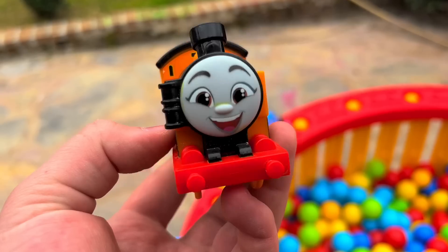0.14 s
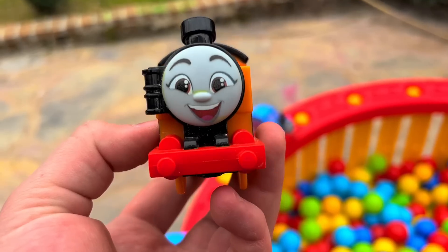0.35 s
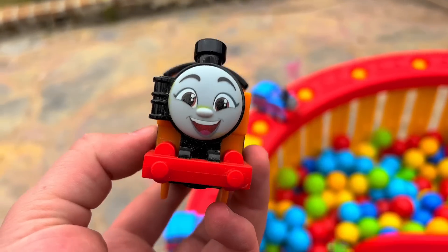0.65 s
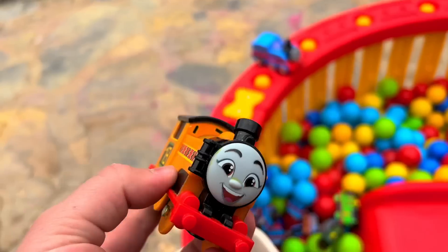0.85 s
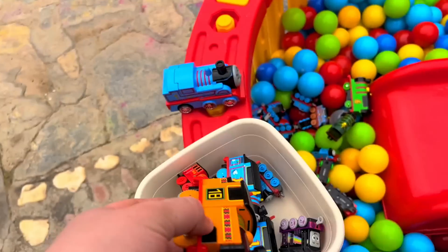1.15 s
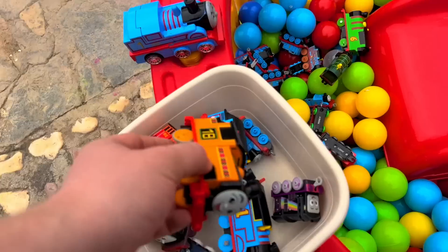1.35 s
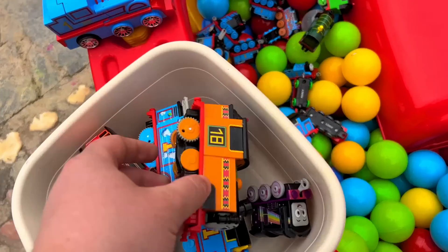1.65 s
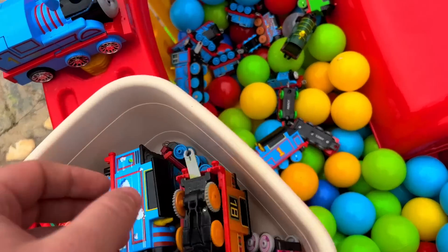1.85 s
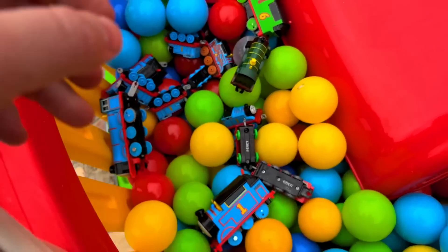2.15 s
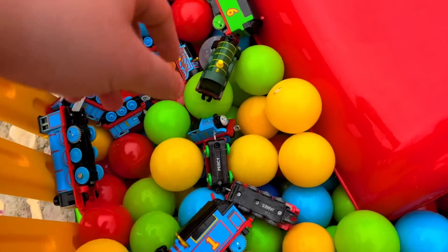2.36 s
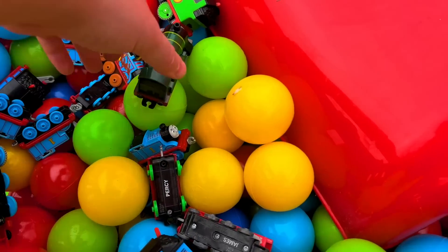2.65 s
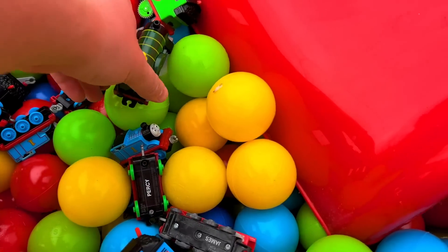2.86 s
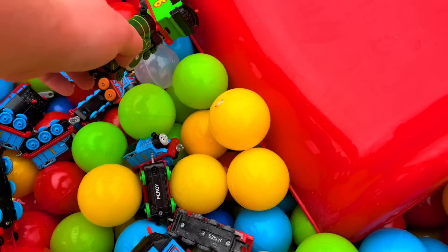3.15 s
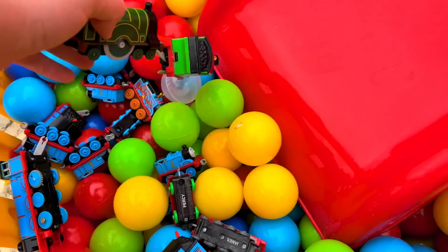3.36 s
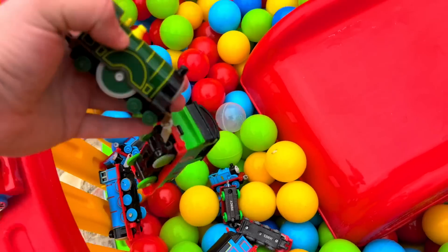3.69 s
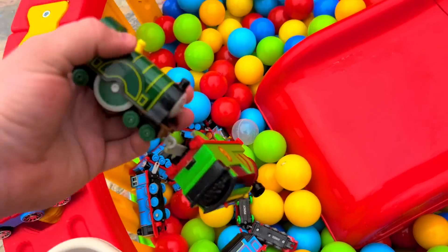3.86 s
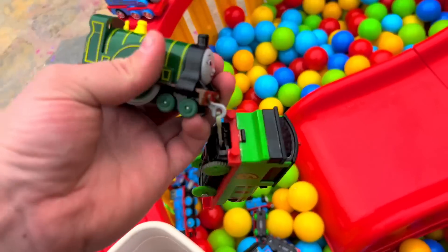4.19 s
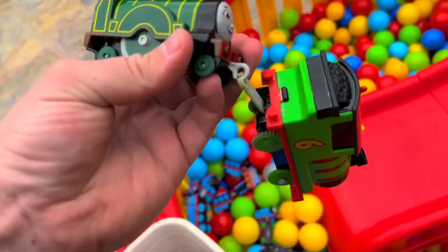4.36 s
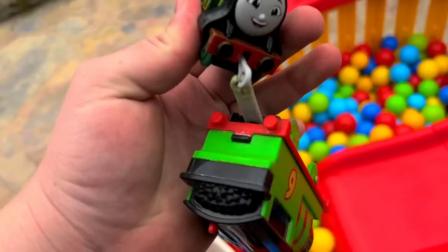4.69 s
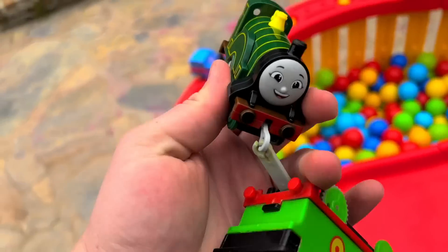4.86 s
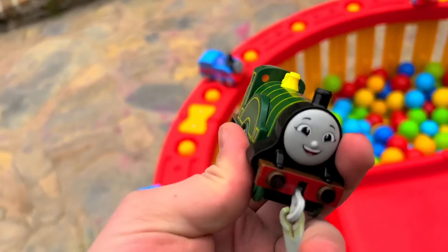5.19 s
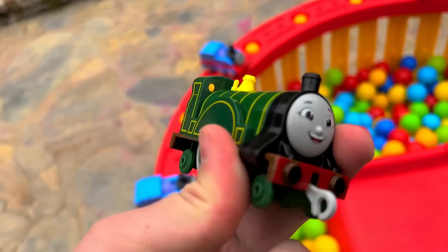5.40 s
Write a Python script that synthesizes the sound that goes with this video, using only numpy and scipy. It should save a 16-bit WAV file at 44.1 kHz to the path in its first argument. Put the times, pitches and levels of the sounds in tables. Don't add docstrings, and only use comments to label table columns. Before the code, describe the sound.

Quiet outdoor yard, then a hollow plastic toy clatters into a tub, soft digging among light balls, small clicks and two sharp snaps in gusty wind.

```python
import sys
import numpy as np
from scipy import signal
from scipy.fft import rfft, irfft, next_fast_len
from scipy.io import wavfile
from scipy.ndimage import uniform_filter1d

SR = 44100
rng = np.random.default_rng(int(sys.argv[2]) if len(sys.argv) > 2 else 0)


def volts(x):
    e = np.asarray(x, float) / 20
    return 10 ** e


def digitize_waveform(pressure):
    field = np.atleast_2d(pressure).T
    bounded = np.clip(field, -1, 1)
    quanta = np.round(bounded * 32767).astype(np.int16)
    wavfile.write(sys.argv[1], SR, quanta)


N = 243917
T = np.arange(N) / SR
M = next_fast_len(N)
F = np.fft.rfftfreq(M, 1 / SR)
EVENT_N = 3072
EVENT_T = np.arange(EVENT_N) / SR

# [pitch_hz, level_db, t60_s]
TOY_MODES = [(1366, -10, 0.11), (1480, -7, 0.033), (2490, -23, 0.04), (3030, -21.5, 0.027)]
# [frequency_hz, left_minus_right_db]
PORT_DB = [(60, 0), (130, -3), (200, -10), (340, -11), (700, -2), (1150, 7), (1700, 3), (3400, 2),
           (5200, 0)]


def unit(x):
    return x / np.sqrt(np.mean(x ** 2))


def peak_one(x):
    return x / np.abs(x).max()


def over_time(table, **ends):
    return np.interp(T, *np.transpose(table), **ends)


def on_log(table):
    hz, value = np.transpose(table)
    return np.interp(np.log(F + 1), np.log(hz + 1), value)


def band(x, lo_hz, hi_hz):
    return signal.sosfilt(signal.butter(2, [lo_hz, min(hi_hz, .45 * SR)], "bandpass", fs=SR, output="sos"), x)


def ring(x, modes):
    out = 0
    for hz, db, t60 in modes:
        pole = np.exp(2j * np.pi * hz / SR - np.log(1000) / (t60 * SR))
        out = out + volts(db) * signal.lfilter([1], [1, -pole], x).imag
    return out


def walk(rate):
    k = int(SR / rate)
    steps = np.repeat(rng.standard_normal(N // k + 1), k)
    return unit(uniform_filter1d(uniform_filter1d(steps, k), k)[:N])


def add_at(out, start_s, sound):
    i = int(start_s * SR)
    out[i:i + EVENT_N] += sound


def gripped_body(push, grip_s):
    return ring(push, TOY_MODES) * (1 - np.exp(-EVENT_T / 0.0024)) * np.exp(-(EVENT_T / grip_s) ** 2)


def wall_thud(push, knock_db, spread):
    soft_blow_hz, db_per_octave, lag_s = 240, 55, 0.00511
    wall_hz = soft_blow_hz * 2 ** ((knock_db + 38.0) / db_per_octave)
    walls = [(wall_hz * 1.28 ** spread[0], 0, .018), (470, -1, .018)]
    walls += [(wall_hz * 1.725 ** u, -5, .022) for u in spread[3:]]
    return np.roll(band(ring(push, walls), 170, 1600), int(lag_s * SR))


def contacts(rows, rise_s, chatter_s, crack_t60_s, trim_db, grit_db, grip_s=None):
    out = np.zeros(N + EVENT_N)
    onset = 1 - np.exp(-EVENT_T / rise_s)
    chatter = onset * np.exp(-EVENT_T / chatter_s)
    noises = rng.standard_normal((len(rows), 3, EVENT_N))
    cracks = band(band(noises[:, 2] * onset * volts(-60 * EVENT_T / crack_t60_s), 5100, 16000), 4500, 21000)
    cracks = cracks + volts(-1.5) * band(cracks, 3300, 7300)
    for (s, db, hz, crack_db, *body_db), noise, crack in zip(rows, noises, cracks):
        spread = noise[2, -6:].clip(-2, 2)
        shell = [(hz, 0, .012)] + [(hz * 1.375 ** u, -6, .011) for u in spread[:3]]
        grit = band(noise[1] * chatter ** .5, 0.26 * hz, 3.48 * hz)
        knock = peak_one(ring(chatter * noise[0], shell)) + volts(grit_db) * peak_one(grit)
        if grip_s:
            body = gripped_body(chatter * noise[1], grip_s)
        else:
            body = wall_thud(noise[0] * chatter ** 0.357, db, spread)
        under_db = body_db[0] if body_db else -16
        sound = peak_one(band(knock, 0.62 * hz, 7040))
        sound = sound + volts(crack_db) * peak_one(crack) + volts(under_db) * peak_one(body)
        add_at(out, s - rise_s, volts(db + trim_db) * sound)
    return out[:N]


def tub_and_pit_contacts():
    # [start_s, knock_peak_db, shell_hz, crack_over_knock_db, thud_over_knock_db]
    tub_hits = [(1.54, -9, 860, -9.5, -18.5), (1.558, -26.5, 730, -17, -6), (1.6, -33.5, 910, -7, 2),
                (1.628, -32.5, 990, -9, -5), (1.683, -21, 900, -3, -6), (1.698, -18.5, 1990, -15, -14),
                (1.71, -15, 1670, -19, -8), (1.721, -16.5, 666, -42, -9.5), (1.735, -27.5, 759, -3, -0.5),
                (1.762, -17, 1960, -9.5, -32), (1.767, -9, 920, 0.5, -17), (1.78, -8, 1010, -19, -15.5),
                (1.788, -6.5, 1480, -40, -21), (1.795, -12, 704, -9.5, -31.5),
                (1.806, -10.5, 1050, -9.5, -17.5), (1.819, -19, 1970, -3, -27.5),
                (1.833, -12, 1550, -10.5, -5), (1.837, -12, 850, -17.5, -10.5),
                (1.871, -24.5, 1510, -5, -1), (1.89, -30, 2890, -3.5, -9.5), (1.903, -42.5, 717, 2, -11),
                (1.914, -51.5, 780, -19, 9.5), (1.97, -28, 2320, -28, -5), (1.995, -42, 2030, -0.5, -11.5)]
    pit_hits = [(2.863, -49.5, 2410, -2.5, 1), (2.912, -44.5, 3750, 9, 4), (2.916, -41.5, 1640, -16, 3.5),
                (2.932, -50.5, 1030, -7, 14.5), (2.982, -45.5, 1080, 11, 0), (3.012, -36.5, 2930, 3, 3),
                (3.036, -24, 1350, -7.5, 4), (3.068, -60.5, 1620, 15, 18), (3.154, -27, 1060, -19, -5.5),
                (3.203, -32.5, 1610, -5, -2), (3.216, -27, 3250, 3, -10.5), (3.233, -30, 2580, -4, -29),
                (3.242, -26.5, 3150, -9, -19), (3.258, -22.5, 3110, 2.5, -9.5),
                (3.282, -36.5, 1410, 9.5, -23), (3.299, -37, 1380, 5, -0.5), (3.313, -46.5, 2630, 16, 10),
                (3.349, -27, 1046, -17, -9.5), (3.369, -50, 900, 9, 7.5)]
    tub = contacts(tub_hits, 0.00055, 0.0035, 0.037, -2.3, -1.3)
    return tub + contacts(pit_hits, 0.00078, 0.0037, 0.033, -2.25, -6.0)


def hand_contacts():
    # [start_s, knock_peak_db, shell_hz, crack_over_knock_db]
    lowered = [
        (0.9784, -40, 4700, -7),
        (0.9877, -36, 2620, 3),
        (1.0054, -38.5, 4670, 0),
        (1.0228, -42, 4600, -22),
        (1.034, -44, 4620, -20),
        (1.0595, -25.5, 4830, 0.5),
        (1.0786, -37, 2170, -26),
        (1.284, -49, 2330, -2),
    ]
    lifted = [(3.645, -58.5, 3980, 11), (3.675, -39, 3130, -3), (3.7395, -44, 1740, -5),
              (3.8, -34, 2900, 13.5), (3.8287, -45, 1680, -24), (3.8741, -38, 1630, -3.5),
              (3.947, -45.5, 1580, -24), (3.9875, -36.5, 2020, -26), (3.9934, -38.5, 2080, -24),
              (4.0253, -43, 1760, -32.5), (4.059, -34.5, 2630, 6.5)]
    # [start_s, knock_peak_db, shell_hz, crack_db, hollow_body_db]
    swinging = [(4.0767, -44, 1520, -34, 3), (4.1077, -29.5, 1550, 7.5, -25), (4.1112, -23, 1640, 0, -8),
                (4.121, -34, 1700, -21, -14), (4.1445, -30, 1480, -12, -6), (4.201, -41.5, 1550, -7, -19),
                (4.261, -46, 1660, 3, -16), (4.2976, -44.5, 1700, 8, -28), (4.338, -29.5, 1840, -2, -10.5),
                (4.3682, -39, 1670, -16, -14), (4.451, -31, 880, -17, -39), (4.4842, -39, 1680, -16, -20),
                (4.4909, -38, 3040, 5.5, -25.5), (4.5207, -25.5, 1980, -4, -12),
                (4.5532, -46, 1650, 11, -13), (4.5718, -53, 1370, 21, -11),
                (4.6198, -27.5, 2830, -0.5, -18), (4.6484, -53, 1390, -10, -18),
                (4.6795, -26, 1480, -3.5, -27), (4.6942, -27, 2090, -18, -32),
                (4.7046, -35.5, 1350, -17, -7), (4.7802, -34.5, 1610, -18, 1),
                (4.8078, -42, 2500, -12, -16)]
    snapping = [(4.9844, -68, 2400, 26, -6), (5.058, -12.5, 1818, 2, -0.5), (5.1264, -47, 3470, -2, -18),
                (5.1494, -41.5, 2730, 6, -8), (5.2083, -30.5, 2320, -3.5, -3.5),
                (5.2787, -28.5, 2440, -21.5, -1), (5.2877, -11, 2590, 8.5, -6), (5.299, -24.5, 2230, 9, 2),
                (5.3074, -18.5, 2200, 4.5, -10), (5.3239, -27, 2410, 11, -15),
                (5.3453, -30.5, 1790, 12, -21), (5.3707, -35.5, 2490, -13, -12),
                (5.4178, -51, 1590, 12, -14), (5.445, -37, 1900, -24.5, 0.5), (5.4617, -42, 2130, 4, -4)]
    tight_s, loose_s, snap_s = 0.018, 0.089, 0.01
    out = contacts(lowered, 0.00041, 0.0035, 0.034, -2.3, -2.5, tight_s)
    for rows, grip_s in (lifted, tight_s), (swinging, loose_s), (snapping, snap_s):
        out = out + contacts(rows, 0.0006, 0.0038, 0.012, -0.76, -8.5, grip_s)
    return out


def rattle():
    # [time_s, level_db]
    stir_tables = [
        [(1.538, -35), (1.59, -56.5), (1.66, -55), (1.706, -44.5), (1.766, -41), (1.834, -36), (1.88, -51),
         (1.96, -63.5), (2.04, -74)],
        [(2.84, -82.5), (2.924, -56), (3.0, -69), (3.1, -59), (3.17, -55), (3.215, -51), (3.26, -39),
         (3.32, -55.5), (3.42, -73)],
    ]
    # [start_s, peak_db, length_s]
    fiddling = [(1.036, -62, 0.047), (4.095, -64, 0.095), (3.66, -62, 0.01), (4.118, -54.5, 0.049),
                (4.355, -57.5, 0.033), (4.697, -55.5, 0.033), (4.505, -46, 0.017), (4.598, -59.5, 0.1),
                (4.806, -65, 0.32), (5.315, -41, 0.011), (5.36, -67, 0.011), (5.436, -51.5, 0.044)]
    # [pitch_hz, level_db, t60_s]
    wall_modes = [(82.2, -11, 0.21), (140, -17, 0.04), (188, -8.5, 0.1), (250, 6, 0.06),
                  (329.2, -2.5, 0.022), (424, -2.5, .05), (560, 6.5, 0.0097)]
    # [level_db], tub then pit
    rumble_db = [9.5, 1.5]
    swell_db_per_s, settle_db_per_s = 431, 286
    treble_db, brighter_per_db = -2, 0.26

    sizes = volts(1.2 * rng.exponential(size=N).clip(0, 4))
    impacts = (rng.random(N) < 1600 / SR) * rng.standard_normal(N) * sizes
    grit = unit(signal.lfilter([1], [1, -.985], np.abs(impacts))) * volts(1.74 * walk(45))
    shell_noise = band(band(grit * rng.standard_normal(N), 877, 3800), 800, 10000)
    knock = unit(shell_noise + 0.088 * ring(impacts, TOY_MODES))
    crack = unit(band(grit * rng.standard_normal(N), 3100, 21000))
    rumble = unit(band(ring(grit * rng.standard_normal(N), wall_modes), 40, 530))

    stirs = [volts(over_time(table, left=-120, right=-120)) for table in stir_tables]
    level = sum(stirs)
    for s, db, length in fiddling:
        before = swell_db_per_s * (s - T).clip(0)
        after = settle_db_per_s * (T - s - length).clip(0)
        level = level + volts(db - before - after)
    treble = volts(treble_db) * level * (level / volts(-48.5)) ** brighter_per_db
    rumble_level = sum(volts(db) * stir for db, stir in zip(rumble_db, stirs))
    return level * knock + treble * crack + rumble_level * rumble


def chatter_bursts(rows, width):
    out, rise_s = np.zeros(N + EVENT_N), .0006
    for (s, db, hz, length), noise in zip(rows, rng.standard_normal((len(rows), EVENT_N))):
        chatter = noise * (1 - np.exp(-EVENT_T / rise_s)) * np.exp(-EVENT_T / length)
        chatter = chatter * np.cos(np.pi / 2 * EVENT_T / EVENT_T[-1])
        add_at(out, s - rise_s, volts(db) * peak_one(band(chatter, hz / width, hz * width)))
    return out[:N]


def small_parts():
    # [start_s, peak_db, pitch_hz, length_s]
    part_ticks = [(1.7595, -37, 11000, .003), (1.7635, -14.5, 9000, 0.0014), (1.7679, -5.5, 10900, 0.0012),
                  (1.781, -19, 159.9, 0.0057), (1.7895, -15, 4270, 0.0022), (1.808, -23.5, 166, 0.013),
                  (1.833, -21.5, 6490, 0.0048), (1.968, -34, 259, 0.011), (1.987, -54, 8000, .002),
                  (2.894, -51.5, 2730, 0.0024), (2.961, -46.5, 1640, .004), (2.968, -45.5, 7000, 0.0041),
                  (3.19, -46, 9000, 0.0046), (3.2145, -24.5, 6500, 0.0021), (3.232, -29, 5870, 0.006),
                  (3.429, -51, 1660, 0.0072), (3.521, -57.5, 10800, 0.003), (3.554, -55.5, 4900, .003),
                  (3.5954, -54.5, 1450, 0.0059), (3.665, -45.5, 7540, .006), (3.675, -36.5, 5300, 0.0036),
                  (4.018, -41, 2010, 0.0027), (4.042, -50, 11000, .003), (4.074, -40, 5500, 0.0026),
                  (4.178, -48, 2750, 0.0031), (4.34, -50, 4380, 0.0033), (4.351, -43, 2100, 0.018),
                  (4.513, -37, 5300, 0.0018), (4.554, -47, 6000, 0.0028), (4.63, -43, 2640, 0.0092),
                  (4.777, -44.5, 6100, 0.0033), (4.866, -47, 1300, 0.0061), (5.06, -28.5, 527, 0.0026),
                  (5.279, -23.5, 5060, 0.003), (5.288, -33, 535, 0.0093), (5.293, -31, 7000, .002),
                  (5.339, -35, 6500, 0.0026), (5.366, -44, 9500, 0.0024), (5.373, -36.5, 8800, 0.0015),
                  (5.38, -44, 3200, .002), (5.389, -42, 2980, 0.0023), (5.422, -37, 730, 0.015),
                  (5.476, -37, 580, 0.004)]
    return chatter_bursts(part_ticks, 1.22)


def hollow_rings():
    # [start_s, peak_db, pitch_hz, length_s]
    toy_rings = [(3.04, -37.5, 1590, .01), (3.26, -40, 1155, 0.0069), (3.876, -48, 1460, 0.0047),
                 (4.115, -39, 1350, 0.025), (4.165, -49, 1350, 0.016), (4.2, -46.5, 1380, 0.0042),
                 (4.49, -39, 3260, .012), (4.53, -49, 1500, 0.012), (4.588, -49, 1400, 0.0052),
                 (4.625, -46, 1430, 0.013), (4.72, -47, 1390, 0.012), (4.782, -54, 1380, 0.02),
                 (5.062, -16, 1388, 0.0035), (5.33, -39, 1316, 0.023), (5.36, -52.5, 1350, .025)]
    return chatter_bursts(toy_rings, 1.04)


def axle_ticks():
    # [start_s, peak_db, pitch_hz, length_s]
    axles = [(.987, -48, 6700, .004), (1.034, -47, 1960, 0.0044), (1.05, -50, 4700, .004),
             (1.059, -37.5, 1740, 0.0024), (1.06, -37, 2680, 0.0034), (1.063, -45, 6900, .004),
             (1.079, -41, 4300, 0.0036), (1.08, -45, 3200, .004), (3.013, -39, 4030, .003),
             (3.113, -50, 2300, .02), (3.241, -30, 5700, 0.0068), (3.258, -23.5, 5300, 0.0033),
             (3.27, -35, 4800, .008), (3.745, -52, 1300, 0.0055), (5.05, -42.5, 1900, 0.0043),
             (5.0575, -12, 7240, 0.0035), (5.2088, -29.5, 2260, 0.0013), (5.138, -53, 9000, .002),
             (5.288, -16, 11600, .002)]
    return chatter_bursts(axles, 1.142)


def pitched_thuds():
    # [start_s, peak_db, pitch_hz, length_s]
    thud_rows = [(1.541, -11.5, 790, 0.0036), (1.543, -18, 1312, .005), (1.555, -25.5, 250, 0.0062),
                 (1.601, -41.5, 434, 0.019), (1.686, -29.5, 940, 0.0074), (1.708, -24.5, 234, 0.0089),
                 (1.723, -25, 340, 0.0073), (1.724, -20.5, 647, 0.0054), (1.743, -23, 232, .01),
                 (1.769, -21, 220, .012), (1.779, -18, 232, 0.0066), (1.781, -14.5, 446, 0.0035),
                 (1.807, -16, 479, 0.0033), (1.834, -15, 488, .006), (1.849, -31.5, 257, .015),
                 (1.859, -28.5, 417, 0.0056), (1.922, -38, 640, 0.0067), (3.265, -34, 302, 0.0087),
                 (3.31, -41, 319, 0.014), (3.364, -43.5, 267, 0.014)]
    rise_s, sag = 0.00095, 0.099
    out = np.zeros(N + EVENT_N)
    for (s, db, hz, length), u in zip(thud_rows, rng.random((len(thud_rows), 2))):
        fade = np.exp(-EVENT_T / length)
        turn = 2 * np.pi * hz * (EVENT_T + sag * length * (1 - fade))
        swing = np.sin(turn) + .4 * np.sin(turn * (1.1 + 0.16 * u[0]) + 2 * np.pi * u[1])
        add_at(out, s, volts(db) * peak_one(swing * (1 - np.exp(-EVENT_T / rise_s)) * fade))
    return out[:N]


def rub():
    # [time_s, level_db]
    rub_level = [(2.9, -75.5), (3.499, -80.5), (3.85, -75), (4.1, -76), (4.4, -64), (4.66, -72),
                 (4.85, -65.5), (5.1, -57), (5.2, -75)]
    # [centre_hz, width_hz, level_db]
    rub_peaks = [(9000, 7000, -4), (6650, 900, -9), (2470, 160, -12), (1395, 120, -13)]
    hiss = 0
    for hz, width, db in rub_peaks:
        noise = band(rng.standard_normal(N), hz - width / 2, hz + width / 2)
        noise = unit(band(noise, hz - width, hz + width / 2))
        hiss = hiss + volts(db + 4.5 * walk(130) + 3 * walk(12)) * noise
    return hiss * volts(over_time(rub_level, left=-110, right=-110))


def ports(x):
    # [frequency_hz, left_lead_radians]
    port_lead = [(0, 0), (170, -.5), (260, 0), (750, 2.2), (1100, 1.2), (1700, .2), (2300, -.7),
                 (4480, -.1), (4800, -1.5), (5150, -4.7), (5600, -5.9), (6500, -6.3), (9040, -7.4),
                 (11500, -8.4), (13900, -9.42), (16500, -10)]
    half = volts(on_log(PORT_DB) / 2) * np.exp(.5j * np.interp(F, *np.transpose(port_lead)))
    return irfft(rfft(x, M) * np.array([half, 1 / half]), M)[:, :N]


def scatter(x):
    lean = volts(-9) * walk(60) * band(band(x, 1400, 5600), 1000, 5800)
    return lean * np.array([[1], [-1]])


def wall_echo(low, hand):
    struck = low + volts(-11) * hand
    t = np.arange(4096) / SR
    tails = rng.standard_normal((3, 4096)) * volts(-60 * t / 0.067) * (t > .003)
    bright, left, right = (signal.oaconvolve(struck, tail)[:N] for tail in tails)
    dull = band(band(np.array([left, right]), 220, 6030), 150, 7600)
    return ports(volts(-33.5) * bright) + volts(-32.5) * dull


def wind():
    # [time_s, level_db]
    buffet_level = [
        (4.2, -62),
        (4.65, -51.5),
        (5.118, -47.5),
        (5.53, -44),
    ]
    flutter_level = [(4.2, -64.5), (4.4, -56.5), (4.65, -53), (4.9, -63.5), (5.4, -68), (5.43, -43),
                     (5.484, -37), (5.53, -55)]
    # [centre_s, peak_db, pitch_hz, length_s]
    eddies = [(5.437, -40, 293, 0.0024), (5.453, -47, 353, 0.0051), (5.476, -31.5, 415, 0.0015),
              (5.497, -43, 290, 0.0061), (2.226, -45.5, 75.6, 0.038), (4.28, -40.5, 132, 0.0042),
              (4.786, -35, 59.6, 0.013), (5.448, -29, 175, 0.0054), (5.481, -27.5, 178, 0.0043),
              (4.711, -26, 140, 0.0073), (4.84, -22, 76, 0.0089), (4.885, -31.5, 66.5, 0.018),
              (4.956, -37, 73.6, 0.027), (5.006, -36.5, 73.5, 0.027), (5.069, -32.5, 58.2, 0.05),
              (5.17, -28, 73.6, 0.013), (5.227, -19, 93, 0.0028), (5.257, -32.5, 57.3, 0.049),
              (5.305, -28.5, 101, 0.0098), (5.435, -29, 77.4, 0.017), (5.461, -26, 92, 0.0083),
              (5.5, -27.5, 99, 0.013)]
    noise = unit(band(band(rng.standard_normal((2, N)), 30, 190.0), 30.7, 190))
    buffet = volts(over_time(buffet_level, left=-90)) * noise
    for s, db, hz, length in eddies:
        t = T - s
        turn = 2 * np.pi * hz * t * (1 - 5.8 * t.clip(-.05, .05))
        buffet[0] += volts(db) * np.exp(-(t / length) ** 2) * np.cos(turn)
        buffet[0] += volts(db - 10.0) * np.exp(-(1.86 * t / length) ** 2) * np.cos(1.79 * turn)
    flutter = unit(band(rng.standard_normal((2, N)), 140, 390))
    flutter = flutter * volts(over_time(flutter_level, left=-90) + 1.0 * walk(60))
    return buffet[0] + 0.4 * buffet[1] * np.array([[1], [-1]]) + flutter


def yard():
    # [time_s, level_db]
    openness = [(.5, 3), (1, 3.5), (1.5, 1.5), (2.1, -1), (2.8, -3), (3.5, -1.5), (3.9, -5.5), (4.3, 0.5),
                (5.53, -1)]
    # [frequency_hz, level_db_per_hz]
    yard_colour = [(15, -36.5), (25, -6), (76, 3), (187, -10.5), (271, -18), (440, -27.5), (1100, -29.5),
                   (1680, -34), (2250, -38.5), (2710, -46), (4850, -48.5), (14000, -76)]
    # [frequency_hz, unshared_0_to_1]
    diffuse = [(60, 0.5), (250, 0.7), (700, 0.2), (1500, 0.1), (4500, 0.5), (6000, 0.15), (7500, 0.08),
               (9500, 0.7), (12500, 0.5)]
    # [frequency_hz, left_lead_radians]
    yard_lead = [(0, 0), (430, -3.3), (1500, -3.3), (2900, -6.3), (7410, -6.4), (13200, -9.4), (16700, -9)]
    rumble_middle_db = [-55.5, -65.5]
    # [time_s, level_db]
    breeze = [(.5, -84), (1, -77.5), (1.5, -75), (2.8, -81), (3.5, -80.5), (4.7, -66)]
    # [time_s, centre_hz]
    rim_band = [(.8, 5460), (1.15, 4500), (2.4, 5000), (4.2, 5250)]
    # [pitch_hz, width_hz, level_db]
    machine = [
        (898, 180, -70),
        (2216, 45, -75.5),
        (237, 29, -67.5),
    ]
    rim_width_hz, rim_db = 350, -1

    unshared = np.clip(on_log(diffuse), 0, 1)
    common, left, right = rfft(rng.standard_normal((3, M)))
    common = np.sqrt(1 - unshared) * common
    lead = np.exp(.5j * np.interp(F, *np.transpose(yard_lead)))
    tilt = volts(on_log(PORT_DB) / 2)
    pair = np.array([tilt * (common * lead + np.sqrt(unshared) * left),
                     (common / lead + np.sqrt(unshared) * right) / tilt])

    levels = [db + over_time(openness) for db in rumble_middle_db] + [over_time(breeze)]
    bass, treble = 1 / (1 + (F / 400) ** 4), 1 - 1 / (1 + (F / 3200) ** 4)
    shares = [bass, 1 - bass - treble, treble]
    colour = volts(on_log(yard_colour))
    out = 0
    for share, db, trim_db, flicker_db in zip(shares, levels, (3, 4, 3), (2.2, 1.2, .8)):
        part = unit(irfft(pair * colour * share, M)[:, :N])
        out = out + part * volts(db + trim_db + flicker_db * walk(4.495))

    pole = np.exp(-np.pi * rim_width_hz / SR)
    slow = signal.lfilter([1], [1, -pole], rng.standard_normal((2, 2, N)))
    turn = np.exp(2j * np.pi * np.cumsum(over_time(rim_band)) / SR)
    out = out + unit(((slow[0] + 1j * slow[1]) * turn).real) * volts(levels[2] + rim_db)

    for hz, width, db in machine:
        hum = unit(irfft(pair / (1 + ((F - hz) / (width / 2)) ** 2), M)[:, :N])
        out = out + hum * volts(db + 0.42 * walk(1.0))
    return out


def bird():
    # [centre_s, pitch_hz, level_db]
    whistles = [
        (.125, 4320, -70),
        (.42, 3360, -73.5),
        (.87, 3360, -72),
    ]
    out = 0
    for s, hz, db in whistles:
        out = out + volts(db) * np.exp(-((T - s) / 0.019) ** 4) * np.sin(2 * np.pi * hz * T)
    return out


def scene():
    low = tub_and_pit_contacts() + rattle()
    hand = hand_contacts() + small_parts() + rub() + bird()
    close = low + hand
    stray = hollow_rings() + pitched_thuds() + axle_ticks()
    top = volts(-23.5) * band(band(close, 14300, 15900), 14300, 15900)
    return ports(close + stray) + scatter(close) + top + wall_echo(low, hand) + wind() + yard()


def low_pass(x):
    return signal.sosfilt(signal.butter(12, 17120, fs=SR, output="sos"), x)


def record(dry):
    top = signal.ellip(8, .2, 70, 16000, fs=SR, output="sos")
    mix = signal.sosfilt(top, band(dry, 32, 18960))
    return low_pass(mix)


dry = scene()
out = record(dry)
digitize_waveform(out)
```